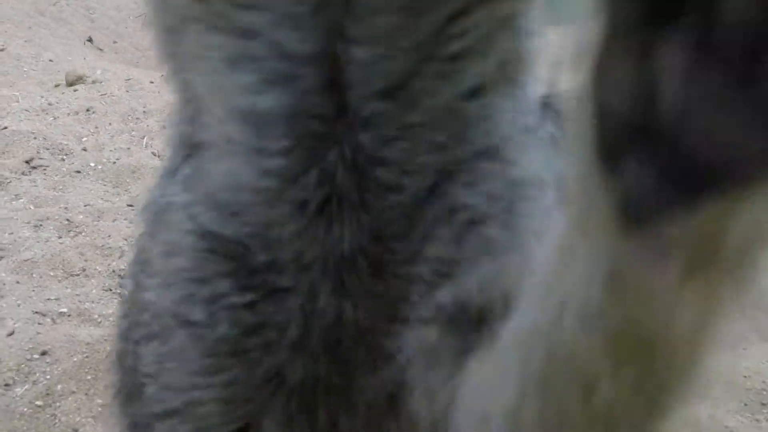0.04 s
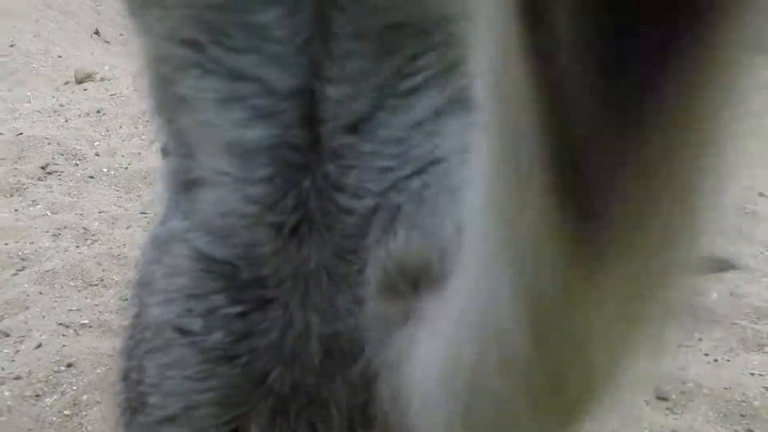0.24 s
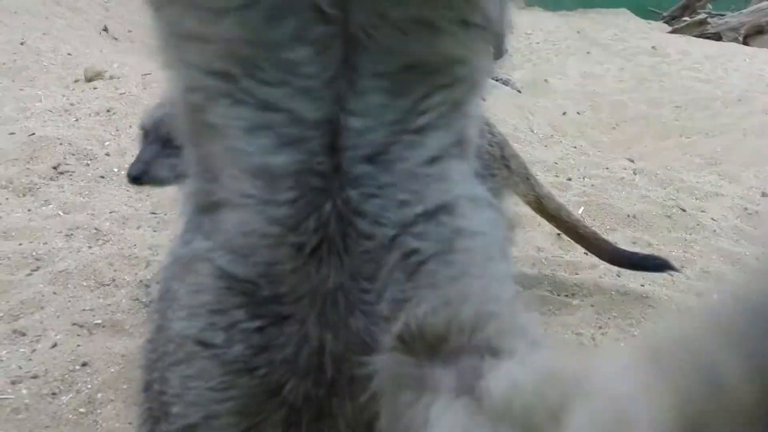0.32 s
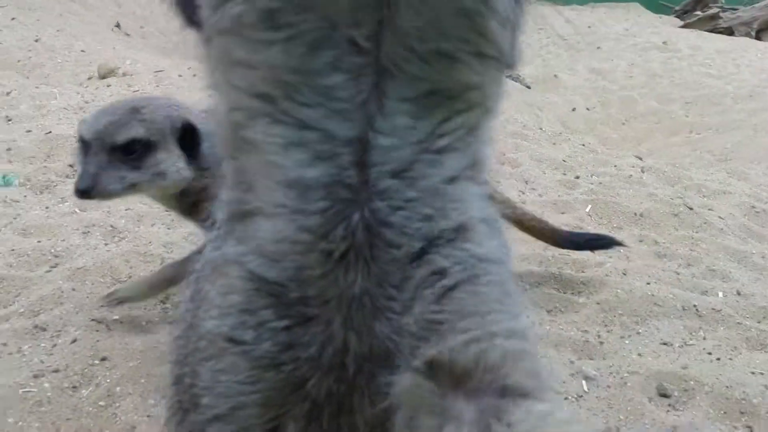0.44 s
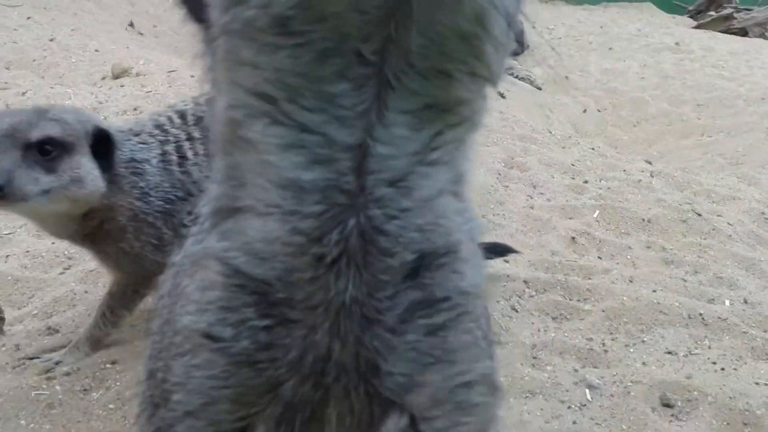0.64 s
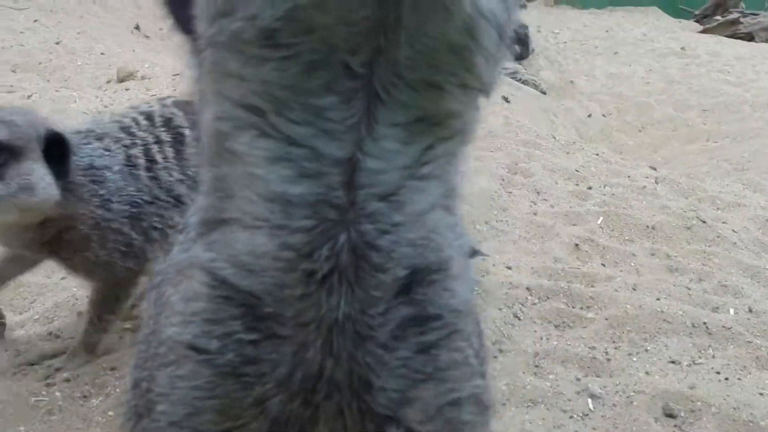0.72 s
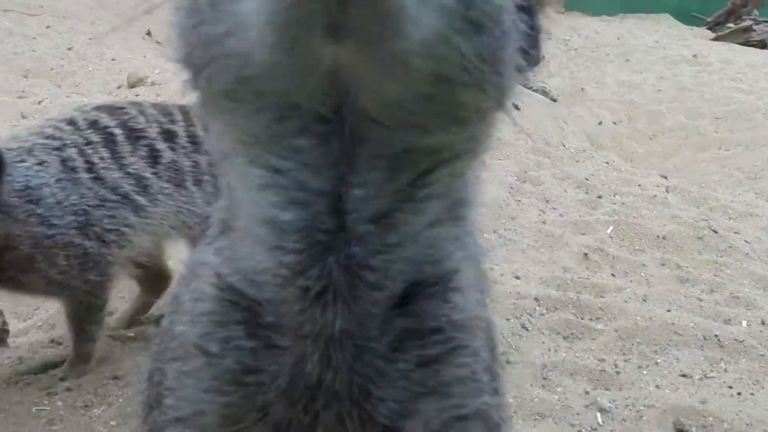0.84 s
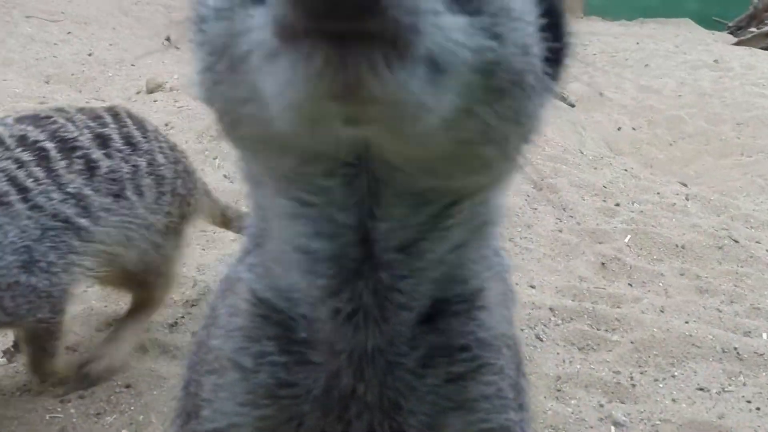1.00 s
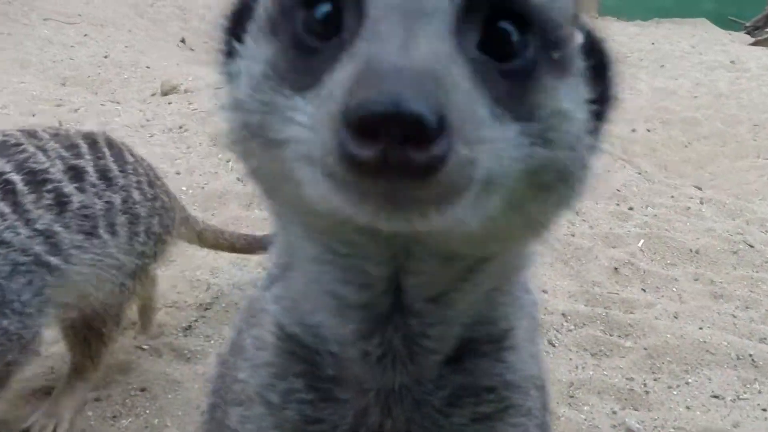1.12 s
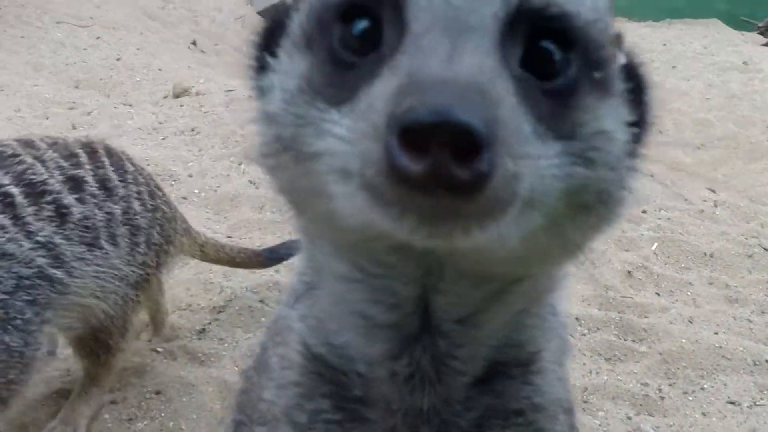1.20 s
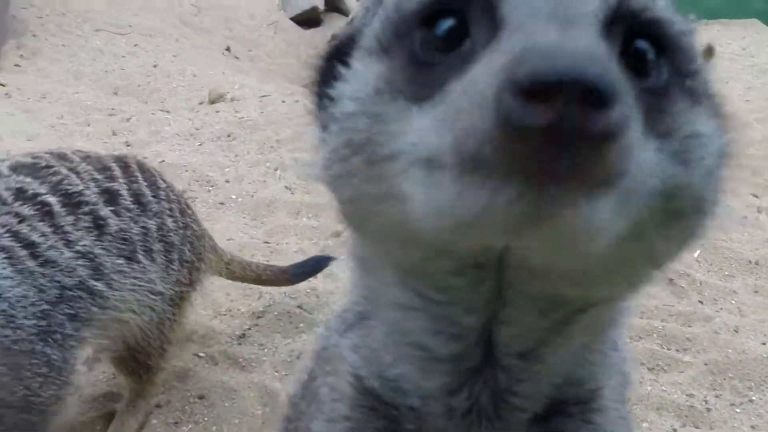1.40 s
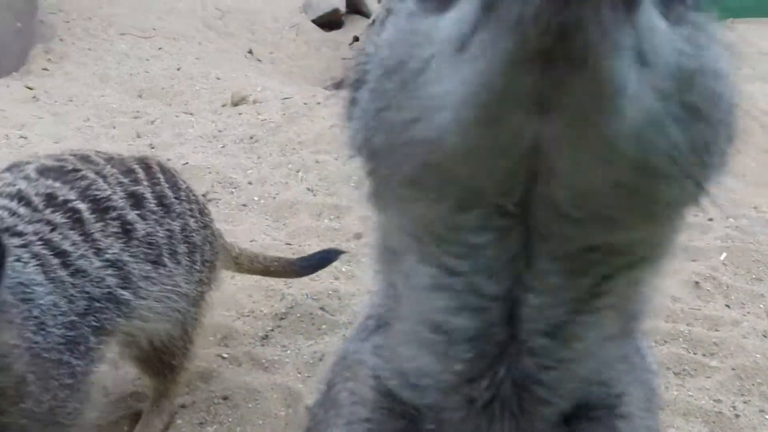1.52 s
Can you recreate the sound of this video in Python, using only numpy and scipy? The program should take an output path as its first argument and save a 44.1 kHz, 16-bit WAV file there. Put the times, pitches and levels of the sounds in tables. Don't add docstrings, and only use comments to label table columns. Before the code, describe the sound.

A sharp burst of claw taps on hard plastic with a short scrape, then quiet airy hiss

```python
import sys
import numpy as np
from scipy import signal
from scipy.io import wavfile
from scipy.ndimage import uniform_filter1d

SR = 44100
rng = np.random.default_rng(int(sys.argv[2]) if len(sys.argv) > 2 else 0)


def to_wav(s):
    ch = np.atleast_2d(s).T
    pcm = np.round(np.clip(ch, -1, 1) * 32767)
    wavfile.write(sys.argv[1], SR, pcm.astype(np.int16))


def gain_from_db(level_db):
    decades = np.asarray(level_db, float) / 20
    return 10 ** decades


N = 68355

# start in seconds, level in dB, chatter decay in seconds per 20 dB,
# brightness in dB per octave.
CLAW_TAPS = [(.2168, -22, .005, -5), (.2205, -21, .002, -5), (.2335, -33, .004, -7), (.2447, -3, .002, 2),
             (.2551, 4.2, .0012, 0), (.2565, -1, .002, -3), (.2607, -2, .0025, 0), (.2633, -2, .0025, -5),
             (.2668, -6, .004, -4), (.2700, -11, .003, -3), (.2740, -16, .004, -4), (.3002, -17, .004, 3),
             (.3028, -10, .003, -4), (.3125, -15, .003, 1), (.3392, -12, .002, -4), (.3466, -11, .002, -1),
             (.3620, -17, .002, 0), (.3750, -8, .002, -3), (.3855, -17, .002, -4)]
# frequency in Hz, level when tapped in dB,
# level when dragged in dB, 60 dB decay time in seconds.
HOUSING_MODES = [(1150, -8, -22, .008), (1600, -3, -7, .007), (1950, -4, -4, .007), (2450, 2, -4, .009),
                 (2600, -12, -3, .018), (2800, -4, -10, .008), (3230, -4, -8, .007), (3750, -6, -7, .005),
                 (4200, -7, -3, .008), (4850, -6, -12, .005), (6000, -9, -15, .003), (7400, -6, -18, .004),
                 (8600, -13, -17, .003), (10100, -12, -19, .003)]
# time in seconds, level in dB.
RUB_PRESSURE = [(.215, -75), (.222, -56), (.243, -45), (.252, -47), (.258, -19), (.272, -26), (.281, -45),
                (.306, -32), (.334, -44)]
# time in seconds, level in dB.
DRAG_PRESSURE = [(.322, -56), (.337, -42), (.3395, -24), (.358, -23), (.373, -24), (.381, -27), (.387, -29),
                 (.390, -47), (.418, -68)]
# start in seconds, level in dB, frequency in Hz, decay in seconds.
PAD_PUSHES = [
    (.217, -23, 65, .009),
    (.2172, -25, 350, .005),
    (.2173, -24, 1040, .004),
    (.2185, -34, 560, .003),
    (.226, -31, 140, .02),
    (.272, -31, 130, .03),
    (.298, -32, 50, .02),
    (.31, -34, 110, .03),
    (.345, -36, 140, .03),
]
# time in seconds, level in dB.
FUR_PRESSURE = [(.214, -66), (.219, -39), (.235, -48), (.265, -38), (.288, -49), (.305, -42), (.335, -48),
                (.385, -49), (.41, -66)]
# frequency in Hz, level in dB per Hz.
FUR_COLOUR = [(120, -4), (250, 0), (600, -2), (950, -5), (1400, -30)]
# start in seconds, length in seconds, level in dB.
WRITE_BUZZES = [
    (.12, .04, -73),
    (.542, .038, -72),
    (.802, .028, -71.5),
    (.892, .034, -71),
    (1.14, .038, -71.5),
    (1.40, .035, -73),
]
# centre in Hz, width in Hz, level in dB.
BUZZ_BANDS = [(8650, 300, -2), (10050, 500, 0), (10550, 300, -8), (12400, 300, -5)]
# frequency in Hz, level in dB per Hz.
HISS_COLOUR = [(170, -12), (230, -1), (400, -4), (1000, -9), (3100, -13), (5000, -20), (8000, -24),
               (12500, -25.5)]
# frequency in Hz, level in dB per Hz.
RUMBLE_COLOUR = [(12, -10), (30, -5), (52, 3), (75, -1), (98, -11), (125, -4), (155, -5), (185, -24)]

HISS_DB, RUMBLE_DB = -61, -54
CLAW_LOW_HZ = 880
SLIPS_PER_S, SLIP_SPREAD_DB = 10000, 1.9
TICK_DB, TICK_HZ, TICK_DECAY_PER_S = -25, 9400, 9000
PIP_HZ, PIP_DB, PIP_HALF_DB = 11320, -74, -2.5
PIP_FIRST_S, PIP_LENGTH_S, PIP_EVERY_S = .009, .013, .04
DUCK_FROM_DB, DUCK_SHARE, RECOVER_DB_PER_S = -52, .16, 22
HOLES_FROM_HZ, HOLE_SHARE, HOLE_UNDER_DB = 11450, .35, -45
EDGE_HZ = 12550


def evened(x):
    return x / np.sqrt(np.mean(x ** 2) + 1e-20)


def curve(points):
    s, db = np.transpose(points)
    return gain_from_db(np.interp(np.arange(N) / SR, s, db, -120, -120))


def add(mix, s, sound):
    part = mix[round(s * SR):][:len(sound)]
    part += sound[:len(part)]


def housing_ring(level_db, tilt_db):
    t = np.arange(2000) / SR
    ring = np.zeros(len(t))
    for k, ((hz, _, _, t60), db) in enumerate(zip(HOUSING_MODES, level_db)):
        decay = gain_from_db(db - 60 * t / t60) / np.sqrt(t60)
        ring += (-1) ** k * decay * np.sin(2 * np.pi * hz * t)
    tick = np.exp(-t * TICK_DECAY_PER_S) * np.cos(2 * np.pi * TICK_HZ * t)
    return ring / np.linalg.norm(ring) - gain_from_db(TICK_DB + tilt_db) * tick


def slips():
    spread_db = SLIP_SPREAD_DB * np.minimum(rng.exponential(1, N), 4)
    size = gain_from_db(spread_db) * rng.standard_normal(N)
    return evened(size * (rng.random(N) < SLIPS_PER_S / SR))


def claws():
    hz, tap_db, drag_db, _ = np.transpose(HOUSING_MODES)
    octaves = np.log2(hz / 2500)
    drag_start_s = DRAG_PRESSURE[1][0]
    out, t = np.zeros(N), np.arange(600) / SR
    for s, db, decay, tilt_db in CLAW_TAPS:
        chatter = rng.standard_normal(len(t)) * gain_from_db(-20 * t / decay)
        modes_db = drag_db if s > drag_start_s else tap_db
        tap = np.convolve(chatter, housing_ring(modes_db + tilt_db * octaves, tilt_db))
        add(out, s, gain_from_db(db) * tap / abs(tap).max())
    out += signal.oaconvolve(slips() * curve(RUB_PRESSURE), housing_ring(tap_db, 0))[:N]
    out += signal.oaconvolve(slips() * curve(DRAG_PRESSURE), housing_ring(drag_db, 0))[:N]
    return signal.sosfilt(signal.butter(4, CLAW_LOW_HZ, "high", fs=SR, output="sos"), out)


def pad():
    out, t = np.zeros(N), np.arange(6000) / SR
    for s, db, hz, decay in PAD_PUSHES:
        add(out, s, -gain_from_db(db) * np.exp(-t / decay) * np.sin(2 * np.pi * hz * t))
    return out


def noise(colour, size, patchy_db, swell_db):
    frames, hz = 4 * N // size + 5, np.fft.rfftfreq(size, 1 / SR)
    a, b, patches = rng.standard_normal((frames, len(hz), 3)).T
    swell = evened(uniform_filter1d(rng.standard_normal(frames), size=6))
    patches = uniform_filter1d(patches, size=8, axis=0)
    patches = evened(uniform_filter1d(patches, size=8, axis=1))
    f, db = np.transpose(colour)
    colour_db = np.interp(np.log(hz + 1), np.log(f + 1), db, -80, -80)[:, None]
    spectra = (a + 1j * b) * gain_from_db(colour_db + patchy_db * patches + swell_db * swell)
    return evened(signal.istft(spectra, nperseg=size, noverlap=3 * size // 4)[1][:N])


def fur():
    return curve(FUR_PRESSURE) * noise(FUR_COLOUR, size=512, patchy_db=2.5, swell_db=1.5)


def resonate(x, hz, width):
    r = np.exp(-np.pi * width / SR)
    return 2 * signal.lfilter([1 - r], [1, -r * np.exp(2j * np.pi * hz / SR)], x).real


def pips():
    t = np.arange(N) / SR
    sounding = (t - PIP_FIRST_S) % PIP_EVERY_S < PIP_LENGTH_S
    gate = uniform_filter1d(1. * sounding, size=130)
    phase = np.pi * PIP_HZ * t + .02 * np.cumsum(rng.standard_normal(N))
    return gain_from_db(PIP_DB) * gate * (np.sin(2 * phase) + gain_from_db(PIP_HALF_DB) * np.sin(phase))


def buzzes():
    t, grit = np.arange(N) / SR, rng.standard_normal(N)
    buzz, gate = np.zeros(N), np.zeros(N)
    for hz, width, db in BUZZ_BANDS:
        band = resonate(resonate(grit, hz, width), hz, width)
        buzz += gain_from_db(db) * evened(band)
    for s, length, db in WRITE_BUZZES:
        gate += gain_from_db(db) * (abs(t - s - length / 2) < length / 2)
    return evened(buzz) * uniform_filter1d(gate, size=200)


def air():
    hiss = gain_from_db(HISS_DB) * noise(HISS_COLOUR, size=512, patchy_db=.8, swell_db=.4)
    rumble = gain_from_db(RUMBLE_DB) * noise(RUMBLE_COLOUR, size=2048, patchy_db=1.5, swell_db=.6)
    return hiss + rumble


def scene():
    return (claws() + pad() + fur() + pips() + buzzes() + air())[None]


def duck(dry):
    power = uniform_filter1d(dry[0] ** 2, size=800, origin=399)
    power_db = 10 * np.log10(abs(power) + 1e-12)
    fall = np.arange(N) * RECOVER_DB_PER_S / SR
    wanted_db = DUCK_SHARE * np.maximum(power_db - DUCK_FROM_DB, 0)
    over_db = np.maximum.accumulate(wanted_db + fall) - fall
    return dry / gain_from_db(uniform_filter1d(np.maximum(over_db, 0), size=400))


def drop_top(x):
    hz, _, z = signal.stft(x, SR, nperseg=2048)
    luck = rng.random((129, z.shape[2] // 2 + 1))
    luck = np.repeat(np.repeat(luck, repeats=8, axis=0), repeats=2, axis=1)[:len(hz), :z.shape[2]]
    hz = hz[:, None]
    climb = np.clip((hz - HOLES_FROM_HZ) / (EDGE_HZ - HOLES_FROM_HZ) + .5, 0, 2)
    odds = HOLE_SHARE * climb * (hz > HOLES_FROM_HZ)
    quiet = np.linalg.norm(z[0], axis=0) < gain_from_db(HOLE_UNDER_DB)
    z = z * np.where((luck < odds) & quiet, .03, 1)
    return signal.istft(z, SR, nperseg=2048)[1][:, :N]


def top_cut(x):
    return signal.sosfilt(signal.butter(12, 13380, fs=SR, output="sos"), x)


def record(dry):
    x = drop_top(duck(dry))
    low_pass = signal.firwin(301, EDGE_HZ, window=("kaiser", 7), fs=SR)
    x = signal.oaconvolve(x, low_pass[None], "same")
    return top_cut(x)


dry = scene()
out = record(dry)
to_wav(out)
```